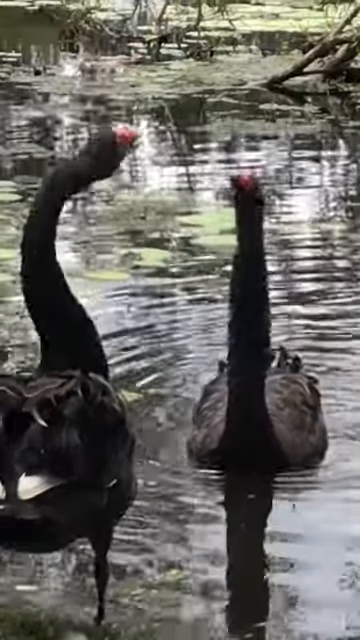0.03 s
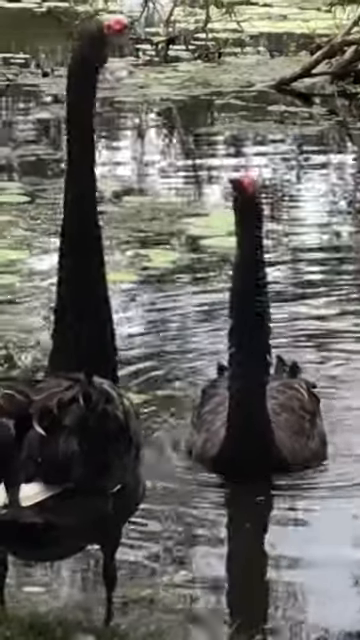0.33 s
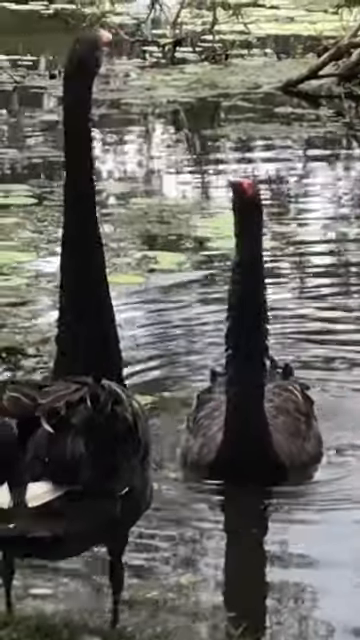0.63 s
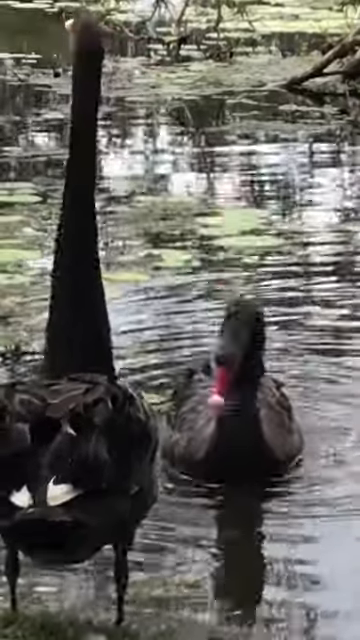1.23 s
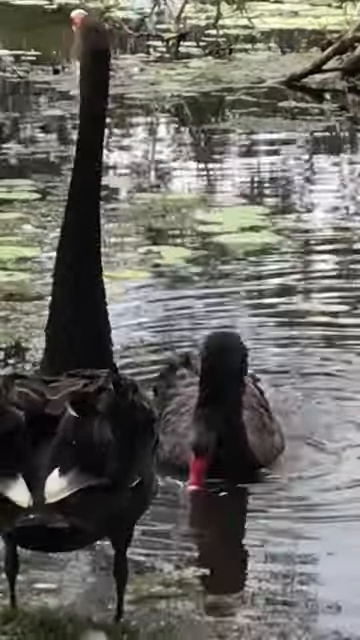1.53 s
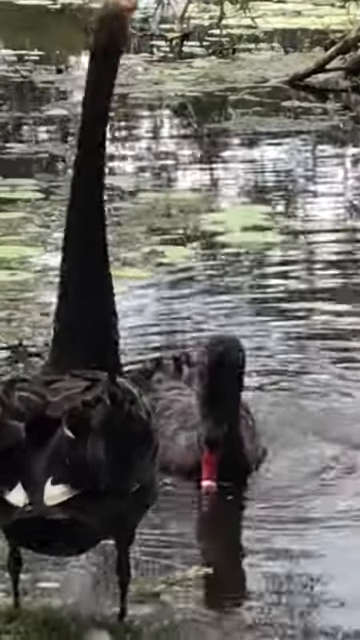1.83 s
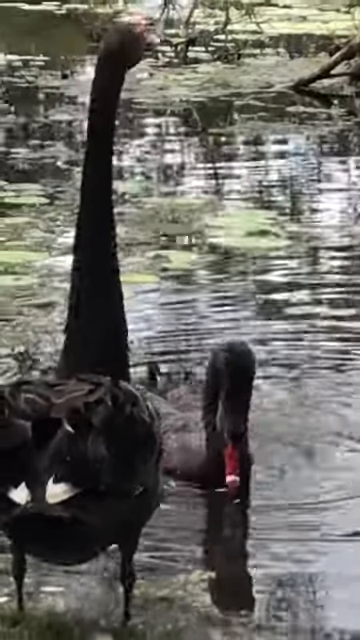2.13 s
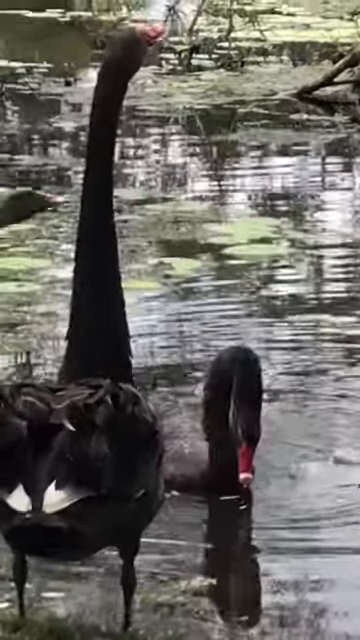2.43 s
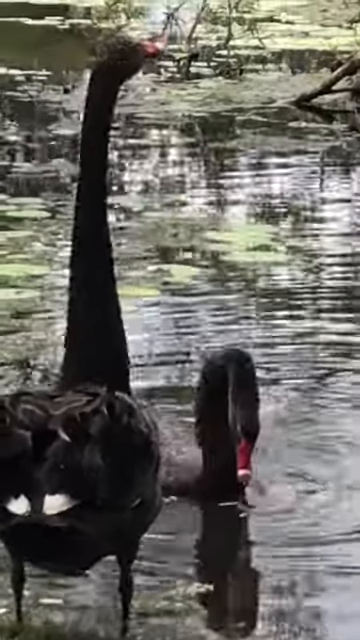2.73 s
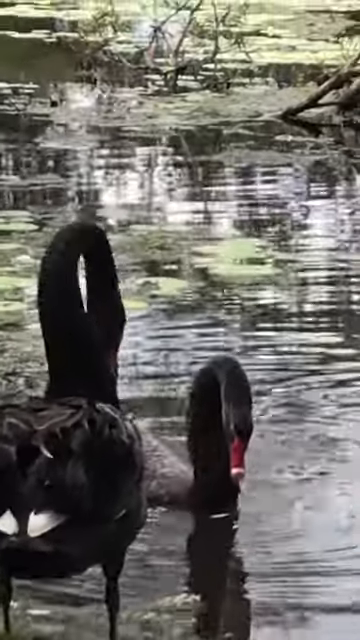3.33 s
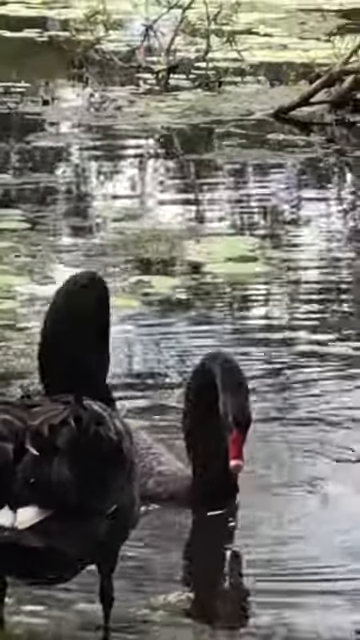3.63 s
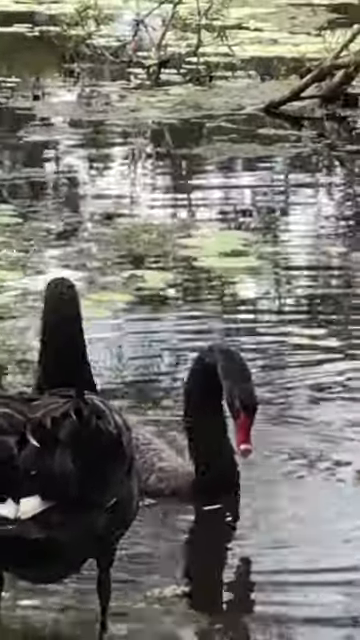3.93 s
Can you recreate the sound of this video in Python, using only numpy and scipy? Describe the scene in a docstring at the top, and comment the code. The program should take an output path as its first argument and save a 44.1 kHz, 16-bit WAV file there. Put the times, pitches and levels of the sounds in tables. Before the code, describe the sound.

Swans calling with reedy bugles and short honks on a pond, small birds peeping faintly.

```python
"""A park pond where two black swans call, each with the vibrating membrane of its syrinx. One bugles
long, reedy notes that break between registers; the other answers with short honks that end in a creak.
Small birds peep and whistle in near-pure tones, and droplets splash lightly. Behind them a distant
engine slowly gathers speed over traffic rumble and soft air. The banks return a faint echo of the calls."""
import sys
import numpy as np
from scipy import signal
from scipy.fft import rfft, irfft
from scipy.io import wavfile

SR = 44100
rng = np.random.default_rng(int(sys.argv[2]) if len(sys.argv) > 2 else 0)


def materialize(psi):
    """Save the field psi as 16-bit PCM at rate SR to the path in sys.argv[1].

    A 1-D psi becomes a single channel; in a 2-D psi each row is a channel.
    """
    bounded = np.clip(np.atleast_2d(psi).T, -1, 1)
    quanta = np.round(bounded * 32767).astype(np.int16)
    wavfile.write(sys.argv[1], SR, quanta)


N = 176400
T = np.arange(N) / SR
WHISTLE_WAVER = 0.011  # share of the pitch


def from_db(db):
    """Decibels to gain."""
    return 10 ** (np.asarray(db) / 20)


def rms_one(x):
    """Scale to unit power."""
    return x / np.sqrt(np.mean(x ** 2) + 1e-20)


def at_hz(points, hz):
    """Read a spectrum on a log-frequency axis."""
    point_hz, level_db = np.transpose(points)
    return np.interp(np.log(hz + 1e-9), np.log(point_hz), level_db)


def in_time(rows, t):
    """Read each column of a curve at the times t."""
    s, *columns = np.transpose(rows)
    return [np.interp(t, s, c) for c in columns]


def glide(rows, t):
    """Pitch of a curve, rounded between its points (cubic segments)."""
    s, hz = np.transpose(rows)[:2]
    s = np.maximum.accumulate(s) + np.arange(len(s)) / SR
    slope, t = np.gradient(hz, s), np.clip(t, s[0], s[-1])
    slope[0], slope[-1] = 2 * slope[0] - slope[1], 2 * slope[-1] - slope[-2]
    i = np.minimum(np.searchsorted(s, t, "right"), len(s) - 1) - 1
    span, step = np.diff(s)[i], np.diff(hz)[i]
    u = (t - s[i]) / span
    bow = (1 - u) * (slope[i] * span - step) - u * (slope[i + 1] * span - step)
    return hz[i] + u * step + u * (1 - u) * bow


def ramp(x):
    """Smooth step from 0 to 1."""
    return np.sin(np.pi / 2 * np.clip(x, 0, 1)) ** 2


def drift(rate, t):
    """Random wavering of spread 1, as long as t, with about rate changes a second."""
    pole = np.exp(-20 * np.pi * rate / SR)
    white = rng.standard_normal(len(t) // 10 + 4000)
    slow = signal.lfilter([1], [1, -2 * pole, pole * pole], white)[2000:]
    return np.interp(np.arange(len(t)) / 10, np.arange(len(slow)), rms_one(slow))


def noise(spectrum):
    """Noise of the given colour, unit power."""
    colour = from_db(at_hz(spectrum, np.fft.rfftfreq(N, 1 / SR)))
    return rms_one(irfft(rfft(rng.standard_normal(N)) * colour, N))


def turns(hz):
    """Phase in radians of an oscillator that follows a pitch."""
    return 2 * np.pi * np.cumsum(hz) / SR


def multiples(pitch, count=15):
    """Frequencies of the harmonics, one row each."""
    return np.arange(1, count + 1)[:, None] * pitch


def park_ambience():
    """A bed of traffic rumble and soft outdoor air, with a faint high hiss that comes and goes."""
    # Colours of the three layers: (frequency [Hz], relative level [dB])
    rumble_colour = [(22, -29.5), (40, -16.5), (58, 4), (80, -0.5), (105, -3.5), (140, -1.5), (190, -7.5),
                     (260, -12), (400, -27), (700, -55.5)]
    air_colour = [(200, 0), (600, 3), (1000, -0.5), (1700, -4.5), (2800, -6.5), (4000, -12.5), (6300, -18),
                  (9000, -30), (12000, -46), (15500, -47.5)]
    hiss_colour = [(9000, -33), (11900, 3), (13000, -5.5), (15500, -2.5)]
    # Swell of the hiss: (time [s], level [dB])
    hiss_swell = [(1.8, -94.5), (2.05, -62.5), (2.25, -59), (2.6, -105.5)]
    hiss_db, = in_time(hiss_swell, T)
    rumble = from_db(-32.5) * noise(rumble_colour)
    air = from_db(-45.5 + 0.77 * drift(2.2, T)) * noise(air_colour)
    return rumble + air + from_db(hiss_db) * noise(hiss_colour)


def engine():
    """Low orders of a far engine gathering speed, wavering on their way across the water."""
    # Run-up: (time [s], firing rate [Hz], relative levels of orders 1, 2 and 2.5 [dB])
    run_up = [(0.0, 50.72, -36.5, -39, -37), (3.16, 62.65, -31, -34, -41.5), (4.0, 69.7, -32, -28.5, -48)]
    trim_db, third_db = -3, -43
    rate, first_db, second_db, between_db = in_time(run_up, T)
    phase = turns(rate * (1 + 0.0047 * drift(4.5, T)))
    out = np.zeros(N)
    for order, db in [(1, first_db), (2, second_db), (2.5, between_db), (3, third_db)]:
        level = from_db(trim_db + db + 1.66 * drift(4.4, T))
        out += level * np.sin(order * phase + 2 * np.pi * rng.random())
    return np.sqrt(2) * out


def splashes():
    """Brief grainy sprays of droplets."""
    # Splash hits: (time [s], level [dB])
    hits = [(1.035, -43), (1.616, -45), (1.715, -45.5), (1.755, -43.5), (1.926, -47)]
    # Colour of the spray: (frequency [Hz], relative level [dB])
    spray_colour = [(1000, 4), (2500, -1.5), (5800, 2.5), (7500, -23), (15000, -24)]
    attack_s, decay_s, grain_db = 0.0023, 0.027, 2
    envelope = sum(from_db(db) * ramp((T - s) / attack_s) * np.exp(-np.abs(T - s) / decay_s)
                   for s, db in hits)
    grain = rms_one(from_db(grain_db * drift(260, T)))
    return envelope * grain * noise(spray_colour)


def far_whistles():
    """Far birds whistle thin, wavering tones that swell and fade."""
    # High whistles: (start [s], length [s], pitch [Hz], level [dB])
    notes = [(0.796, 0.11, 8650, -59), (1.603, 0.28, 8670, -63), (3.457, 0.1, 8725, -60.5),
             (3.493, 0.0387, 6790, -52), (3.62, 0.0552, 5367, -51)]
    out = np.zeros(N)
    for start, length, hz, level_db in notes:
        on = (T > start) & (T < start + length)
        u = (T[on] - start) / length
        pitch = hz * (1 + WHISTLE_WAVER * drift(208, u))
        out[on] += from_db(level_db) * np.sqrt(np.sin(np.pi * u)) * np.sin(turns(pitch))
    return out


def slurred_whistle():
    """A small bird lifts a note, dips, then swings up through a wide arch."""
    # Contour of the whistle: (time [s], pitch [Hz], level [dB])
    contour = [(3.625, 2650, -53), (3.715, 2860, -49), (3.765, 2650, -49), (3.85, 3310, -50.5),
               (3.905, 3060, -44), (3.945, 2400, -58)]
    on = (T > contour[0][0]) * (T < contour[-1][0])
    _, level_db = in_time(contour, T)
    level = from_db(level_db + 3 * drift(70, T))
    pitch = glide(contour, T) * (1 + WHISTLE_WAVER * drift(190, T))
    return on * level * np.sin(turns(pitch))


def peeps():
    """Small birds peep near-sines that arch up and down, lifted as they cross the beak's resonance."""
    # Arched peeps: (start [s], top pitch [Hz], level before beak and fade [dB])
    notes = [(.128, 3100, -39.5), (0.616, 3300, -45), (2.051, 2865, -49.5), (2.328, 3280, -45),
             (2.394, 3410, -51.5), (2.484, 3526, -45.5), (2.571, 3310, -42.5), (2.66, 3432, -42),
             (2.755, 3510, -49), (2.862, 3500, -44.5), (3, 3380, -41.5), (3.244, 3545, -45.5),
             (3.466, 3450, -46)]
    length_s, arch, fade_db, octave_db = 0.125, 0.33, -9.5, -17
    beak_hz, beak_half_width_hz = 2910, 480
    out = np.zeros(N)
    for start, top_hz, level_db in notes:
        on = (T > start) & (T < start + length_s)
        u = (T[on] - start) / length_s
        pitch = top_hz * (1 - arch * (2 * u - 1) ** 2 + 0.0094 * drift(210, u))
        beak = 1 / (1 + ((pitch - beak_hz) / beak_half_width_hz) ** 2)
        phase = turns(pitch)
        tone = beak * np.sin(phase) + from_db(octave_db) * np.sin(np.pi * u) * np.sin(2 * phase)
        level = from_db(level_db + fade_db * u + 3.24 * drift(70, u))
        out[on] += level * tone * ramp(10 * u) * ramp(10 * (1 - u))
    return np.sqrt(2) * out


def syrinx(pitch, gains, rough, t):
    """Vibrating membrane: harmonics of one jittering cycle, each fluttering, raspy when rough."""
    jitter, flutter_db, rasp_db = 0.027, 2.12, -13.5
    phase = turns(pitch * (1 + jitter * rough * drift(236, t)))
    out = np.zeros(len(t))
    for k, gain in enumerate(gains, 1):
        noise_band = drift(270, t) * np.cos(k * phase) + drift(333, t) * np.sin(k * phase)
        rasp = from_db(rasp_db) * rough * noise_band
        flutter = from_db(flutter_db * drift(14, t))
        out += gain * (k * pitch < SR * 0.45) * flutter * (np.sin(k * phase) + rasp)
    return np.sqrt(2) * out


def honking_swan():
    """Each honk scoops up and brightens, then sags and breaks into slow, creaky pulses."""
    # Honks: (start [s], length [s], top pitch [Hz], scoop [share of pitch],
    # level before the throat [dB], treble tilt [dB/octave])
    honks = [(0.671, 0.114, 1181, 0.07, -37.5, 0), (1.453, 0.097, 1191, 0.07, -36.5, 0.5),
             (2.229, 0.11, 1173, 0.05, -38.5, 0.5), (3.06, .149, 1055, 0.01, -39, 2),
             (3.375, 0.023, 1054, 0, -38.5, -2)]
    # Throat resonances: (frequency [Hz], gain [dB])
    throat = [(1050, 0), (1170, 1), (2300, 3.5), (3150, 1), (3500, -3), (4200, -9.5), (4650, -4.5),
              (5270, -3.5), (5800, -10.5), (7200, -17.5), (8400, -14.5), (10400, -28.5), (12700, -29.5),
              (15500, -47)]
    attack_s, release_s, scoop_s = 0.0032, 0.0084, 0.0208
    opening_s, closed_db_per_octave = 0.0083, -13
    creak_s, creak_hz, creak_depth, creak_sag, creak_fade_db = 0.045, 104.6, 0.7, 0.046, -5.5
    out = np.zeros(N)
    for start, length, top_hz, scoop, level_db, open_tilt in honks:
        on = (T > start) & (T < start + length)
        t = T[on] - start
        creak = np.clip(1 - (length - t) / creak_s, 0, 1)
        pitch = top_hz * (1 - scoop * np.exp(-t / scoop_s) - creak_sag * creak ** 2)
        tilt = open_tilt + closed_db_per_octave * np.exp(-t / opening_s)
        colour_db = at_hz(throat, multiples(top_hz)) + tilt * np.log2(multiples(pitch) / pitch)
        gains = from_db(level_db + creak_fade_db * creak + colour_db)
        pulse_hz = creak_hz * (1 + 0.15 * drift(44, t))
        pulses = 1 + creak_depth * np.sqrt(creak) * np.cos(turns(pulse_hz))
        voice = syrinx(pitch, gains, rough=0.11 + 1.26 * creak, t=t)
        out[on] += voice * pulses * ramp(t / attack_s) * ramp((length - t) / release_s)
    return out


def bugling_swan():
    """Reedy, gliding notes that break between registers; the overtones swell with effort."""
    # Bugled notes: (treble tilt [dB/octave], roughness [0-1], curve), each curve point being
    # (time [s], pitch [Hz], fundamental [dB], octave [dB], upper overtones together [dB])
    notes = [ (-4, 0.028, [(0.177, 1428, -32, -40, -38), (0.215, 1463, -34.5, -26.5, -26.5),
             (0.3, 1437, -38.5, -26, -32.5), (0.358, 1361, -34, -34, -43.5)]),
             (9, 0.11, [(0.36, 1274, -36, -44, -40), (0.54, 1178, -43.5, -52, -42.5),
             (0.595, 1115, -43, -58, -59)]), (-6.5, 0.13, [(0.603, 1008, -40, -52, -38),
             (0.625, 987, -42.5, -62, -37), (0.655, 953, -43, -54, -45)]),
             (0, 0.039, [(1.074, 1473, -33, -34, -34), (1.132, 1468, -32, -27, -31),
             (1.217, 1435, -43.5, -49.5, -38)]), (4, 0.14, [(1.22, 1313, -56, -35, -28),
             (1.25, 1308, -40, -31.5, -36), (1.295, 1301, -36, -37.5, -32), (1.316, 1304, -34, -48, -31.5),
             (1.39, 1295, -40, -37.5, -39), (1.485, 1260, -39.5, -42, -35.5),
             (1.55, 1299, -34.5, -47, -33.5), (1.6, 1298, -41.5, -52, -50)]),
             (0, 0.19, [(2.662, 1156, -38, -49, -50.5), (2.868, 1104, -37.5, -57, -37),
             (2.935, 1161, -32.5, -48, -44)]), (-9, 0.096, [(2.938, 1249, -32, -50, -36),
             (3.012, 1307, -40, -43.5, -39), (3.06, 1284, -41, -45, -52)]),
             (-9, 0.15, [(3.715, 811, -44.5, -60.5, -73.5), (3.741, 826.9, -40, -74, -64.5),
             (3.835, 855, -40, -64.5, -70)]), (2.5, 0.31, [(3.838, 1014, -40, -65.5, -57),
             (3.86, 1057, -40.5, -65, -42.5), (3.915, 1110, -42.5, -61, -57)])]
    # Throat colour of the upper overtones: (frequency [Hz], relative gain [dB])
    throat = [(2500, 26), (3200, 9), (4400, 4), (5300, -1), (6400, -1.5), (7000, -3), (7350, -24.5),
              (7800, -11.5), (8800, -16.5), (11500, -25), (13200, -32), (14700, -41)]
    attack_s, release_s = 0.01, 0.0071
    # High notes scoop up at the start and drop into the break, by these shares of the pitch.
    scoop, drop = 0.056, 0.06
    bend_s, high_register_hz = 0.0107, 1380
    out = np.zeros(N)
    for tilt, rough, curve in notes:
        start, end = curve[0][0] - attack_s / 2, curve[-1][0] + release_s
        on = (T > start) & (T < end)
        t = T[on]
        bend = scoop * np.exp((start - t) / bend_s) + drop * np.exp((t - end) / bend_s)
        is_high = curve[1][1] > high_register_hz
        pitch = glide(curve, t) * (1 - bend * is_high)
        _, fundamental_db, octave_db, upper_db = in_time(curve, t)
        upper_hz = multiples(pitch)[2:]
        upper = from_db(at_hz(throat, upper_hz) + tilt * np.log2(upper_hz / pitch))
        upper *= from_db(upper_db) / np.linalg.norm(upper, axis=0)
        gains = np.vstack([from_db(fundamental_db), from_db(octave_db), upper])
        envelope = ramp((t - start) / attack_s) * ramp((end - t) / release_s)
        out[on] += syrinx(pitch, gains, rough, t) * envelope
    return out


def banks(x):
    """A quick reflection off the bank and a short, dull scatter from the trees."""
    # Bank reflection: (delay [s], level [dB])
    reflections = [(0.016, -26.5)]
    t60_s, scatter_db, lowpass_hz = 0.18, -14, 9200
    t = T[:SR]
    pole = np.exp(-2 * np.pi * lowpass_hz / SR)
    dull_noise = signal.lfilter([1], [1, -pole], rng.standard_normal(SR))
    tail = dull_noise * from_db(-60 * t / t60_s) * ramp(t / 0.0097)
    scatter = signal.fftconvolve(x, tail / np.linalg.norm(tail))[:N]
    slap = sum(from_db(db) * np.pad(x, (int(s * SR), 0))[:N] for s, db in reflections)
    return from_db(scatter_db) * scatter + slap


def scene():
    """Mono mix: the bugling swan is the driest caller; the others send more to the echo."""
    bugle, honk = bugling_swan(), honking_swan()
    birds = peeps() + slurred_whistle() + far_whistles()
    echo = banks(from_db(-0.5) * bugle + from_db(6.5) * honk + from_db(4.5) * birds)
    return (bugle + honk + birds + echo + splashes() + engine() + park_ambience())[None]


def record(dry):
    """A steep low-pass trims the very top."""
    cutoff_hz = 15700
    return signal.sosfilt(signal.ellip(12, 0.1, 80, cutoff_hz, fs=SR, output="sos"), dry)


dry = scene()
out = record(dry)
materialize(out)
```